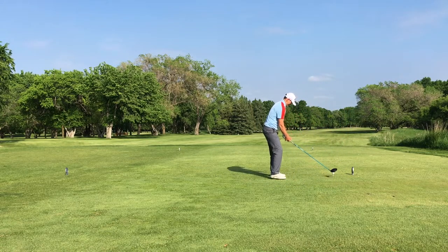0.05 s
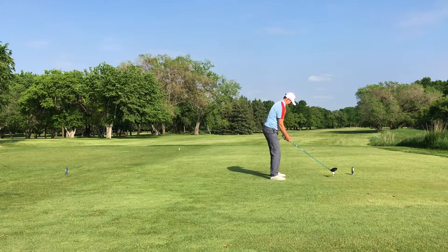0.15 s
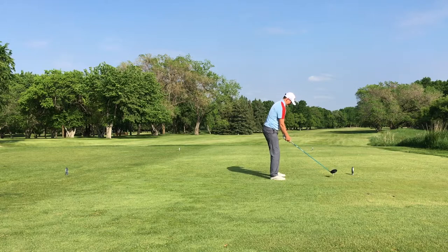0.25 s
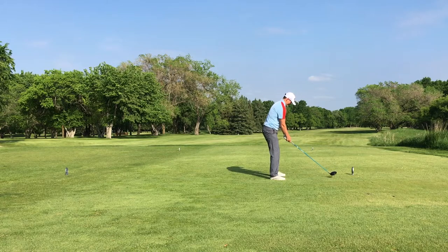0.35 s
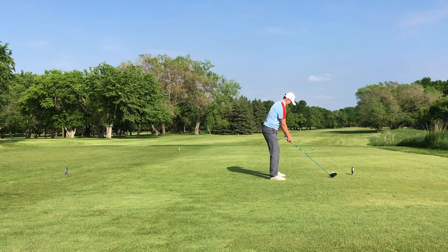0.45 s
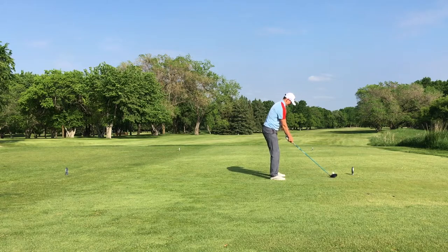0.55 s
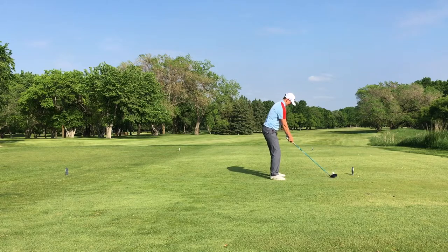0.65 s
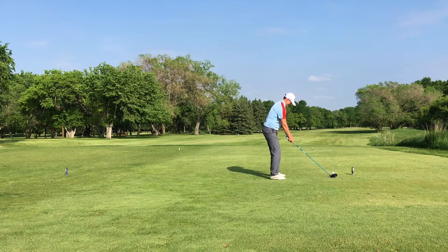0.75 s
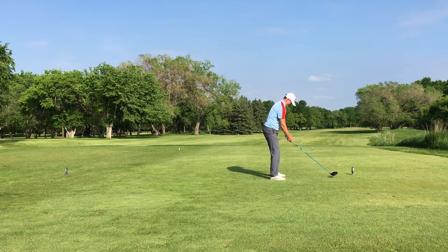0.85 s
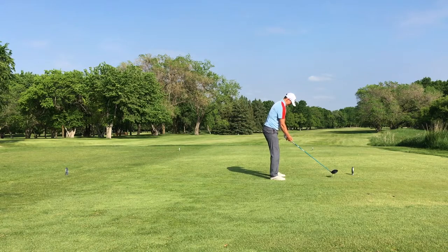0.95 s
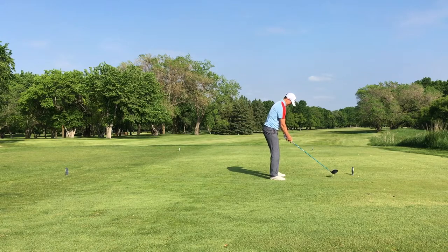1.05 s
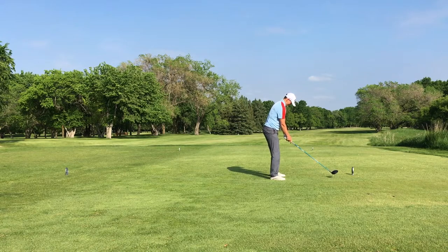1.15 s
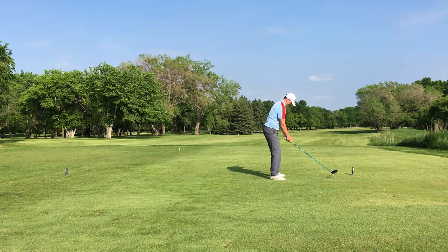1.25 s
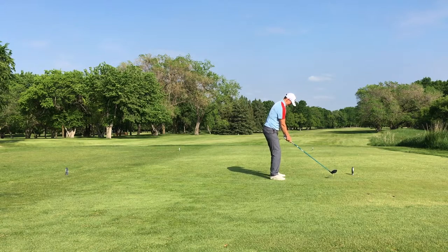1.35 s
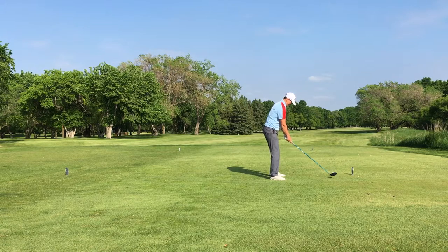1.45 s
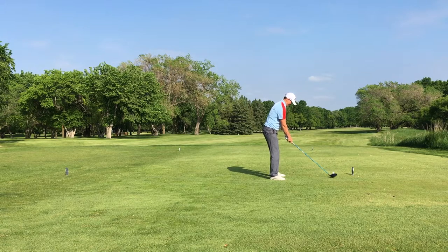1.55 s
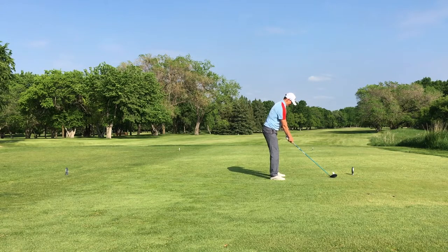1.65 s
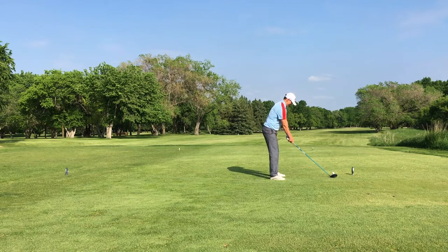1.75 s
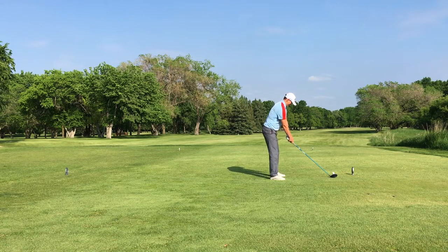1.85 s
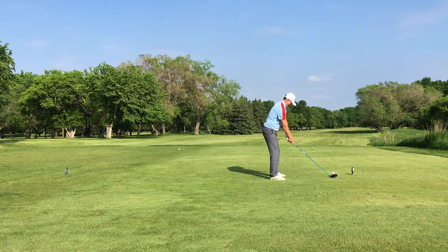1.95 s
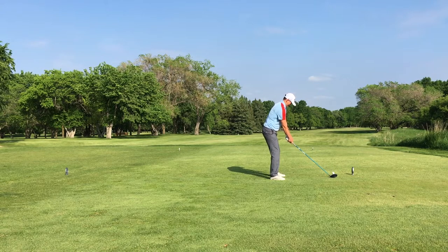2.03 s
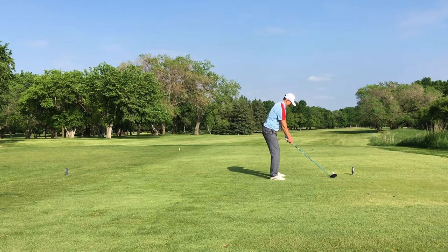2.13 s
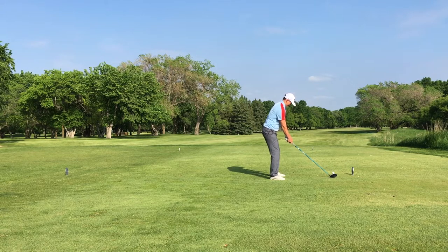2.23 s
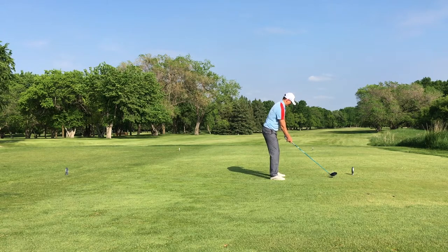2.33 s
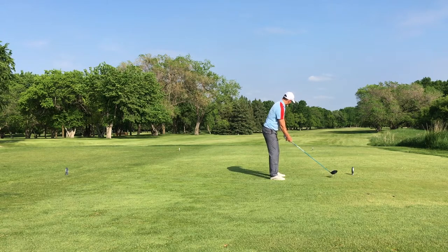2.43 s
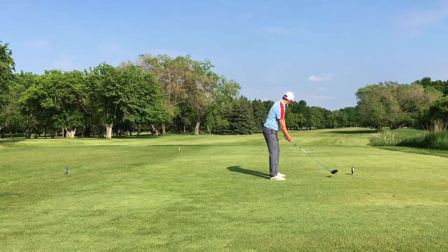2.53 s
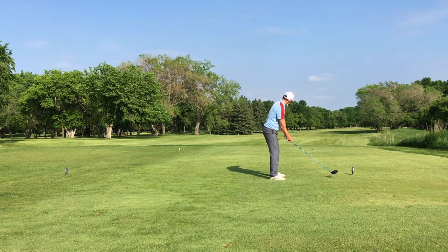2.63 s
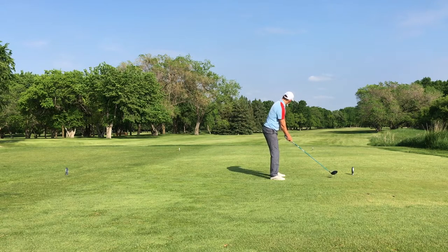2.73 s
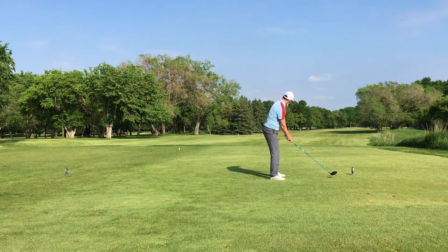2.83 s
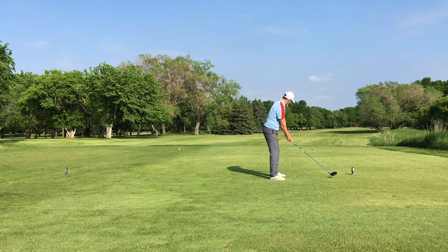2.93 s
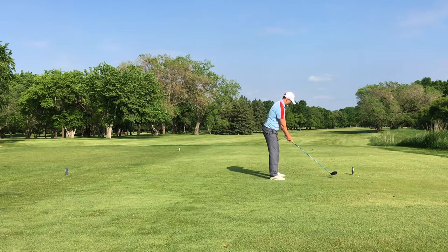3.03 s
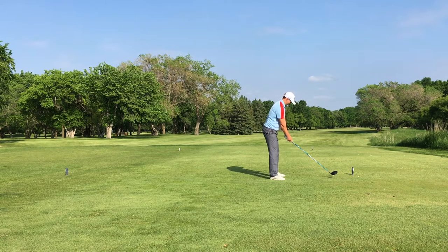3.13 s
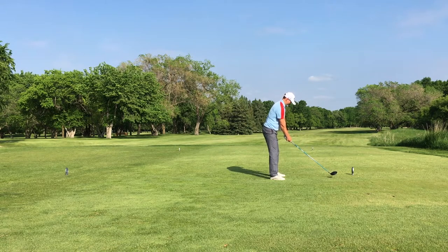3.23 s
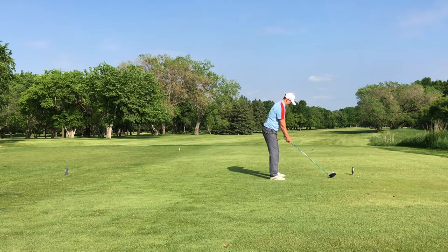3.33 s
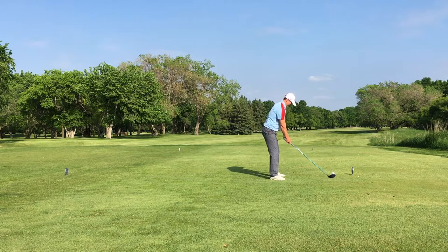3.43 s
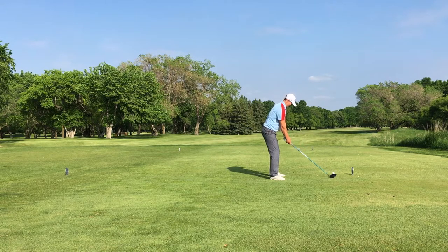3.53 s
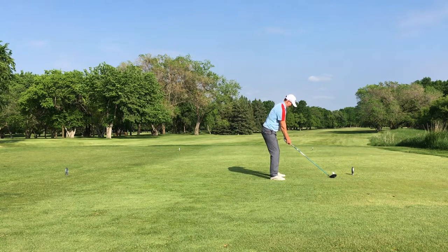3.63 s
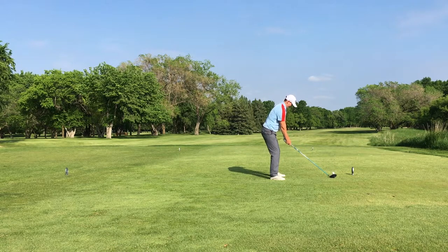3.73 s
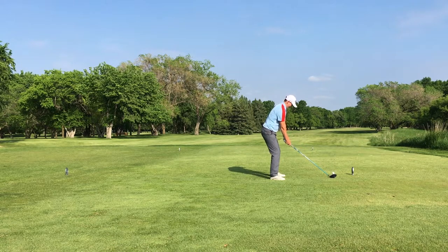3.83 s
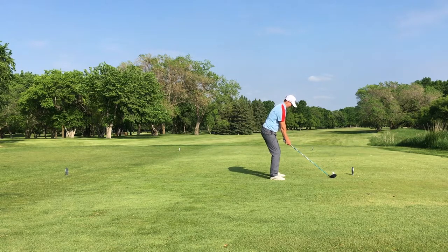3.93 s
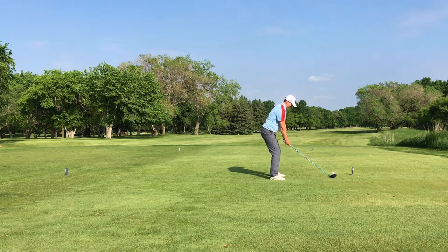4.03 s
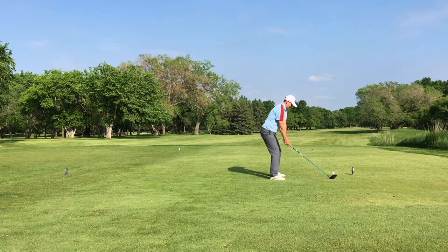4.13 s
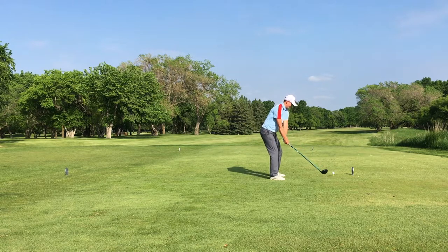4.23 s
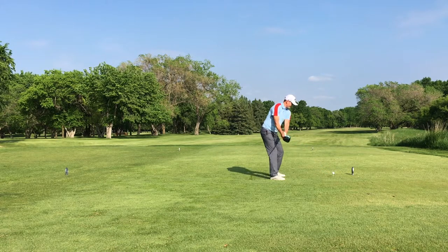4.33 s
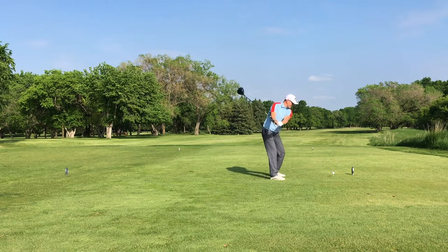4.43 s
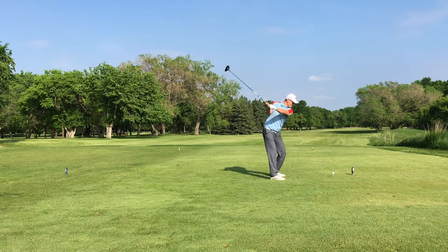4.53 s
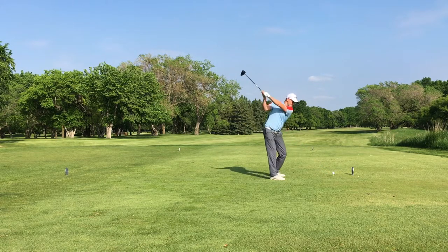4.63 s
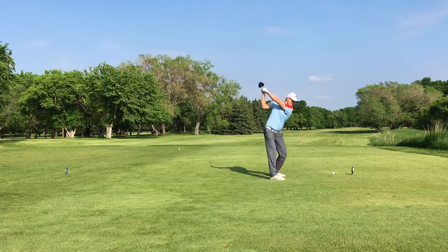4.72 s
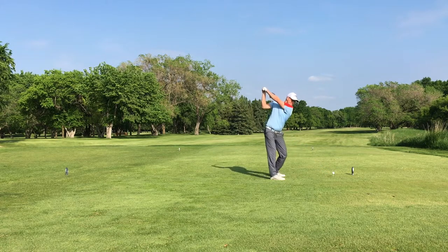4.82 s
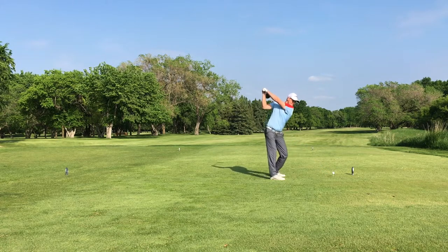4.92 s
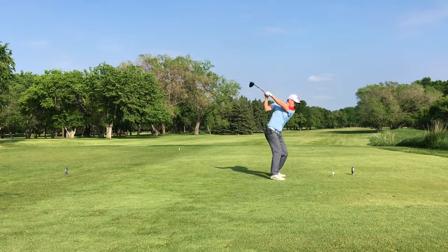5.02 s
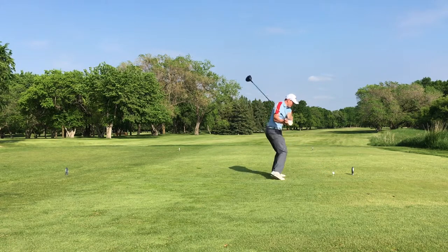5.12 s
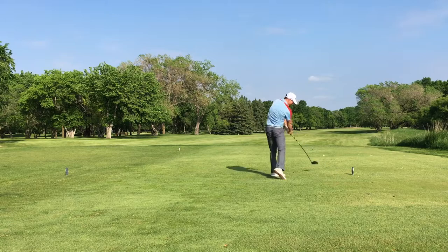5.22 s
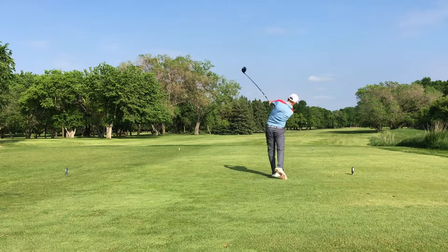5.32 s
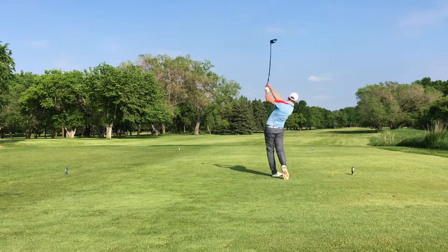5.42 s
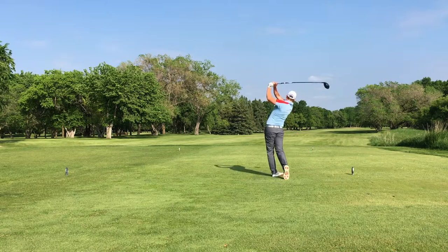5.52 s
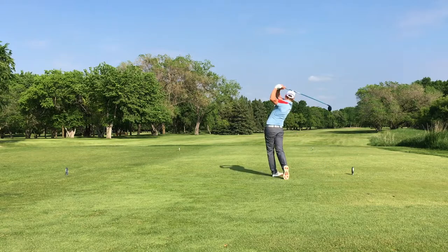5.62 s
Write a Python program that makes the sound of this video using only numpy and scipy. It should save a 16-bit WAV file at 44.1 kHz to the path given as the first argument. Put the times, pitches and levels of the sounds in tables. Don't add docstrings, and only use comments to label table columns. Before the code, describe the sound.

Outdoors on a calm golf course, a nearby songbird whistles four short sliding phrases while other birds answer faintly, blurred by leaves. Low wind puffs bump the microphone over distant road hum. Near the end the club lightly brushes grass, swishes down and strikes the ball with one very loud metallic crack, echoed by the trees.

```python
import sys
import numpy as np
from scipy import signal
from scipy.fft import rfft, irfft
from scipy.io import wavfile
from scipy.ndimage import uniform_filter1d

SR = 44100
rng = np.random.default_rng(int(sys.argv[2]) if len(sys.argv) > 2 else 0)


def boost_factor(decibels):
    exponent = np.asarray(decibels, float) / 20
    return 10 ** exponent


def store_pcm(level_fs):
    pcm = np.round(np.clip(level_fs, -1, 1) * 32767).astype(np.int16)
    wavfile.write(sys.argv[1], SR, np.atleast_2d(pcm).T)


N = 250047


def evened(x):
    return x / np.sqrt(np.mean(x ** 2) + 1e-20)


def smoothed(x, size):
    return uniform_filter1d(uniform_filter1d(x, size=size), size=size)


def drift(size, length=N):
    return evened(smoothed(rng.standard_normal(length), size))


def read_curve(points, hz):
    f, value = np.transpose(points)
    return np.interp(np.log(hz + 1), np.log(f + 1), value)


def add_at(mix, start_s, sound):
    part = mix[round(start_s * SR):][:len(sound)]
    part += sound[:len(part)]


def fader(rows):
    time_s, level_db = np.transpose(rows)
    return boost_factor(np.interp(np.arange(N) / SR, time_s, level_db, -150, -150))


def coloured(x, db_of):
    return irfft(rfft(x) * boost_factor(db_of(np.fft.rfftfreq(len(x), 1 / SR))), len(x))


def noise(spectrum, patchy_db, size=1024):
    hop = size // 4
    hz = np.fft.rfftfreq(size, 1 / SR)
    a, b, patches = rng.standard_normal((N // hop + 5, len(hz), 3)).T
    patches = uniform_filter1d(patches, size=8, axis=0)
    patches = evened(uniform_filter1d(patches, size=10, axis=1))
    z = (a + 1j * b) * boost_factor(read_curve(spectrum, hz)[:, None] + patchy_db * patches)
    return evened(signal.istft(z, nperseg=size, noverlap=size - hop)[1][:N])


def foliage(delay_s, build_up_s, longer, decay):
    hz, t, z = signal.stft(rng.standard_normal(SR), SR, nperseg=256)
    lumps = uniform_filter1d(rng.standard_normal(z.shape), size=3, axis=0)
    lumps_db = 2.4 * evened(uniform_filter1d(lumps, size=9, axis=1))
    decay_db = 60 * t / (longer * read_curve(decay, hz)[:, None])
    tail = signal.istft(z * boost_factor(lumps_db - decay_db), SR, nperseg=256)[1]
    tail = tail * np.minimum(np.arange(len(tail)) / SR / build_up_s, 1)
    return np.concatenate([np.zeros(round(delay_s * SR)), tail / np.linalg.norm(tail)])


def road_hum():
    # pitch_hz, density_db (dB per Hz)
    road = [(18, -75), (30, -53), (65, -13.5), (128, -0.5), (158, -10), (248, -9.5), (283, -22),
            (350, -15.5), (378, -22), (625, -19), (676, -16), (953, -14.5), (2220, -29.5), (14500, -45),
            (16500, -45)]
    return boost_factor(-59) * noise(road, patchy_db=-0.73)


def passing_vehicle():
    # time_s, level_db
    approach = [(0, -72.5), (1, -71.5), (2, -70), (3, -71), (4, -70.5), (4.4, -66), (4.8, -62),
                (5.1, -61.5), (5.67, -79.5)]
    # pitch_hz, density_db
    engine = [(150, -31), (290, -0.5), (320, -2.5), (350, -3.5), (610, -7), (655, -3), (700, -4),
              (1100, -4.5), (2500, -35.5)]
    return fader(approach) * noise(engine, patchy_db=2.0, size=4096)


def overtone_db(k, hz):
    # pitch_hz, level_db
    beak = [(4000, -37.5), (6500, -42.5), (8500, -45.5), (10500, -38), (12000, -30), (15000, -40)]
    if k == 2:
        slope_db = 4.5 * np.maximum(np.minimum(hz, 11900) - 8300, 0) / 1000
    else:
        slope_db = -25 * np.maximum(hz - 12700, 0) / 1000
    return read_curve(beak, hz) + slope_db


def note(rows):
    time_s, pitch_hz, level_db = np.transpose(rows)
    start_s, end_s = time_s[0], time_s[-1]
    t = np.arange(start_s, end_s, 1 / SR)
    pitch = uniform_filter1d(np.interp(t, time_s, pitch_hz), size=150, mode="nearest")
    turns = np.cumsum(pitch) / SR
    tone = np.sin(2 * np.pi * turns)
    for k in (2, 3):
        audible = k * pitch < 16000
        tone = tone + boost_factor(overtone_db(k, k * pitch)) * audible * np.sin(2 * np.pi * k * turns)
    edge = np.minimum(np.minimum(t - start_s, end_s - t) / .0015, 1)
    return start_s, np.sqrt(2) * boost_factor(np.interp(t, time_s, level_db)) * tone * edge


def sung(voice, effort_db, swell_s, turns):
    time_s, pitch_hz = np.transpose(turns)
    t = np.linspace(time_s[0], time_s[-1], num=60)
    pitch = np.interp(t, time_s, pitch_hz)
    swell_db = -15 * np.maximum(1 - (t - time_s[0]) / swell_s, 0)
    fade_db = -6.5 * np.maximum(1 - (time_s[-1] - t) / .011, 0)
    return np.transpose([t, pitch, effort_db + read_curve(voice, pitch) + swell_db + fade_db])


def through_air(notes, twigs_db, flutter_db, wet_db, trees_db, count, effort=1):
    # pitch_hz, t60_s
    leaves = [(300, .15), (1000, 0.53), (3000, 0.57), (8000, 0.42), (14000, 0.3)]
    dry = np.zeros(N)
    for rows in notes:
        add_at(dry, *note(rows))
    dry = dry * effort
    echoes = np.zeros(300)
    echoes[rng.integers(20, 300, size=count)] = boost_factor(twigs_db) * rng.standard_normal(count)
    echoes[0] = 1
    fluttering = dry * boost_factor(flutter_db * drift(250))
    near = signal.oaconvolve(fluttering, echoes / np.linalg.norm(echoes))[:N]
    near = coloured(near, lambda hz: -22 / (1 + ((hz - 4200) / 19) ** 2))
    scatter = np.zeros(SR)
    add_at(scatter, 0, boost_factor(wet_db) * foliage(.004, 0.0043, 0.19, leaves))
    add_at(scatter, 0, boost_factor(trees_db) * foliage(0.024, 0.0037, 1.37, leaves))
    return near + signal.fftconvolve(dry, scatter)[:N]


def note_swells():
    # time_s, half_width_s, level_db
    swells = [(.5, .006, 0), (.56, .01, 6.5), (.6, 0.012, 5.5), (.62, 0.013, 5), (.75, .015, 0),
              (.797, 0.0046, -6), (.815, 0.0097, 0.5), (.85, 0.011, -3.5), (.91, 0.0071, 4),
              (.935, .012, -0.5), (.985, 0.01, -1), (1.035, 0.021, -5.5), (2.034, 0.0072, -11),
              (2.088, 0.0072, -6), (2.097, 0.0033, 7), (2.193, 0.0034, -2), (2.52, 0.0022, -8),
              (2.205, 0.0092, 1), (2.226, 0.0065, -5), (2.252, 0.0093, 0), (2.287, .01, 1.5),
              (2.315, 0.01, 4), (2.36, 0.036, -3), (2.405, 0.011, 0), (2.436, 0.01, -12.5),
              (2.455, 0.0078, 2), (2.51, .012, 1), (3.616, 0.0095, 3), (3.63, 0.0018, -15),
              (3.655, 0.016, -1.5), (3.68, 0.011, -1.5), (3.75, 0.0077, 2), (3.774, 0.0071, -6),
              (3.82, 0.013, 4), (3.855, .004, -4), (3.88, 0.026, -4), (2.535, .01, 0.1),
              (4.918, 0.0055, -1), (4.946, 0.014, -7), (4.74, .004, -3), (4.776, 0.0037, -5.5),
              (4.963, .005, 3.5), (4.985, .01, 1), (5.06, .008, -3), (5.114, 0.002, 4), (5.11, 0.0034, -5),
              (5.085, 0.0018, 6.5), (5.078, 0.0045, -2), (.765, .003, -3), (.808, 0.0026, -0.5),
              (.9, .004, -4), (3.58, 0.0049, 2.5), (2.47, 0.0047, -2), (5.1, .007, 1), (5.128, .008, -1)]
    t = np.arange(0, N, 16) / SR
    time_s, width_s, level_db = np.transpose(swells)[:, :, None]
    bumps_db = (level_db * np.exp(-((t - time_s) / width_s) ** 2)).sum(0)
    return boost_factor(np.interp(np.arange(N) / SR, t, bumps_db))


def near_singer():
    # pitch_hz, level_db
    throat = [(2150, -51.5), (2450, -50.5), (2850, -41.5), (3250, -44), (3750, -40), (4200, -45.5),
              (5000, -54), (6200, -62)]
    # (time_s, pitch_hz)
    first = [
        (0, 0.018, [(0.493, 3380), (0.505, 4300), (0.517, 4750), (0.53, 4440)]),
        (0, 0.0056, [(0.545, 5480), (0.558, 6260), (0.58, 5970), (0.6, 5870), (0.625, 4950)]),
        (0, .03, [(0.717, 2594), (0.75, 2867), (0.775, 2627), (0.797, 2143), (0.815, 3174), (0.84, 3082), (0.865, 2914)]),
        (0, 0.021, [(0.907, 2780), (0.93, 2830), (0.95, 2640), (0.968, 2224), (0.985, 3130), (1.045, 2850)]),
    ]
    second = [
        (0, 0.016, [(2.03, 3530), (2.045, 4880), (2.062, 4810), (2.078, 5380), (2.092, 3230)]),
        (0, 0.014, [(2.093, 3600), (2.11, 3720), (2.125, 3883), (2.143, 3160)]),
        (0, .012, [(2.189, 2950), (2.205, 2897), (2.225, 2213), (2.235, 3160), (2.243, 2866), (2.27, 3270), (2.29, 3050), (2.312, 2200)]),
        (0, 0.0027, [(2.312, 2313), (2.335, 2470), (2.372, 2563), (2.395, 3790), (2.418, 4120), (2.434, 4200), (2.448, 4014), (2.476, 3182), (2.52, 3075)]),
    ]
    third = [
        (-5, 0.014, [(3.552, 3080), (3.562, 3830), (3.575, 3805), (3.585, 3650), (3.593, 2880)]),
        (1, 0.014, [(3.599, 2890), (3.612, 3824), (3.626, 4040), (3.634, 4450), (3.646, 3164), (3.68, 2905), (3.71, 2080)]),
        (1, 0.0033, [(3.728, 2260), (3.75, 2840), (3.768, 3420), (3.779, 3506), (3.79, 2716), (3.85, 2577), (3.9, 2343)]),
    ]
    fourth = [
        (4.5, 0.0082, [(4.737, 3520), (4.744, 4690), (4.753, 5200), (4.763, 5200), (4.771, 4710), (4.778, 3700)]),
        (1.2, 0.013, [(4.913, 2900), (4.925, 3050), (4.945, 2190), (4.97, 3033), (4.985, 2930), (5.005, 2390), (5.02, 2570)]),
        (1.44, 0.016, [(5.05, 3190), (5.065, 3310), (5.085, 3686), (5.103, 5130), (5.115, 3480), (5.13, 2860), (5.145, 2510)]),
    ]
    notes = [sung(throat, *row) for row in first + second + third + fourth]
    return through_air(notes, -49.0, 0.68, -13.0, -19.5, count=10, effort=note_swells())


def slur(start_s, length_s, from_hz, to_hz, level_db):
    u = np.linspace(0, 1, num=15)
    slide = u - .45 * np.sin(2 * np.pi * u) / (2 * np.pi) + .05 * np.sin(np.pi * u)
    swell_db = np.interp(u, [0, .5, 1], [-4, 0, -3])
    return np.transpose([start_s + length_s * u, from_hz + (to_hz - from_hz) * slide, level_db + swell_db])


def trill(count):
    start_s, every_s, chip_s = 2.7135, .0552, .013
    high_hz = np.linspace(4800, 5300, num=count)
    low_hz = np.linspace(4450, 3990, num=count)
    level_db = np.linspace(-84, -71, num=count)
    at = start_s + every_s * np.arange(count)
    return [[(s, a, d), (s + chip_s, b, d)] for s, a, b, d in zip(at, high_hz, low_hz, level_db)]


def far_birds():
    # start_s, length_s, from_hz, to_hz, level_db
    falls = [(.538, .028, 3170, 2950, -75), (.775, .025, 5100, 4300, -74), (1.06, .045, 4380, 4000, -71),
             (1.195, .02, 4600, 4280, -74), (1.278, .04, 4480, 3970, -66), (1.54, .045, 7300, 4800, -72),
             (1.577, .029, 2950, 2300, -73.5), (1.7, .031, 7250, 5330, -73), (1.725, .03, 5350, 4770, -70),
             (2.813, .016, 3540, 3430, -76), (3.285, .013, 6670, 4970, -70), (3.373, .074, 3660, 2860, -80),
             (3.81, .025, 3560, 3480, -64), (4.03, .03, 3520, 3480, -76), (4.288, .012, 2900, 2750, -74),
             (4.414, .01, 3060, 2900, -76), (4.455, .014, 3060, 2900, -76), (4.62, .064, 3320, 3020, -81)]
    # start_s, length_s, from_hz, to_hz, level_db
    rises = [(1.59, .034, 4750, 5070, -76), (1.67, .02, 5700, 6100, -79), (1.975, .044, 3500, 4800, -78),
             (2.31, .05, 4500, 5100, -76), (3.28, .03, 3330, 4520, -76), (4.255, .015, 2780, 2900, -73)]
    # (time_s, pitch_hz)
    tunes = [
        (-72, 0.013, [(1.112, 5700), (1.13, 5650), (1.15, 5000), (1.163, 3850), (1.18, 3600)]),
        (-71, .01, [(1.322, 4400), (1.33, 5500), (1.345, 5450), (1.368, 4800), (1.385, 3550), (1.41, 3450), (1.425, 3100)]),
        (-75, 0.0082, [(1.425, 3100), (1.45, 3450), (1.48, 4500), (1.5, 5400), (1.52, 5800)]),
        (-73.5, 0.0053, [(1.622, 2350), (1.636, 3300), (1.655, 3050), (1.672, 3050), (1.682, 2550), (1.715, 2250), (1.755, 2650), (1.775, 2350)]),
        (-81, 0.018, [(1.81, 3500), (1.83, 3750), (1.845, 3500), (1.87, 3700), (1.887, 4600), (1.91, 4700), (1.93, 4450), (1.955, 4750)]),
    ]
    # pitch_hz, level_db
    throat = [(2300, -1.5), (3100, 0), (3600, -1.5), (4500, 4.5), (5600, -1.5)]
    notes = [slur(*row) for row in falls + rises] + trill(count=17)
    notes += [sung(throat, *row) for row in tunes]
    return through_air(notes, -28, 2.0, -10, -10, count=30)


def gusts():
    # start_s, hold_s, level_db
    puffs = [(.88, .03, -82), (1.019, 0.0072, -50), (1.167, 0.068, -58), (1.414, 0.027, -39),
             (1.505, 0.01, -50), (1.597, 0.16, -39), (1.73, 0.028, -41), (1.897, 0.035, -41.5),
             (2.06, 0.04, -48.5), (2.44, 0.042, -51.5), (2.581, 0.034, -55), (2.702, 0.028, -57.5),
             (2.98, 0.021, -58.5), (3.088, 0.11, -59.5), (3.32, 0.3, -55), (3.67, 0.076, -49.5),
             (3.859, 0.022, -54), (3.97, 0.024, -54), (4.188, 0.03, -58.5), (4.324, 0.12, -59),
             (4.647, 0.026, -60), (5.094, 0.13, -50.5), (5.33, 0.051, -54.5)]
    # time_s, level_db
    breeze = [(.9, -101), (1.1, -61.5), (3, -61), (5.68, -63)]
    t = np.arange(N) / SR
    coarse = t[::64]
    start_s, hold_s, level_db = np.transpose(puffs)[:, :, None]
    rise_db = 714 * np.maximum(start_s - coarse, 0)
    fall_db = 406 * np.maximum(coarse - start_s - hold_s, 0)
    return fader(breeze) + np.interp(t, coarse, boost_factor(level_db - rise_db - fall_db).max(0))


def steadied(x):
    return x / np.sqrt(smoothed(x ** 2, 2000) + 0.017)


def wind():
    # pitch_hz, density_db (dB per Hz)
    turbulence = [(12, -49), (20, -29), (60, 0.5), (100, -2.5), (161, -12.5), (229, -22), (292, -45.5),
                  (387, -39.5), (480, -50), (500, -49), (650, -83), (1100, -120)]
    push = gusts() * steadied(noise(turbulence, patchy_db=6.5, size=2048))
    push = push * boost_factor(1.5 * drift(500))
    stop = boost_factor(-34.5)
    return stop * np.tanh(push / stop)


def wind_flaps():
    # start_s, pitch_hz, level_db
    slaps = [
        (1.418, 142, -30),
        (1.633, 158, -34),
        (1.7, 150, -31.5),
        (1.754, 122.5, -30),
        (1.879, 147, -31.5),
    ]
    out = np.zeros(N)
    t = np.arange(4000) / SR
    for start_s, pitch_hz, level_db in slaps:
        wobble = np.sin(2 * np.pi * pitch_hz * t / (1 + 4.4 * t))
        add_at(out, start_s, boost_factor(level_db - 60 * t / 0.074) * wobble * np.minimum(t / 0.0038, 1))
    return out


def rival_singer():
    # (time_s, pitch_hz)
    arches = [
        (-9, 0.0035, [(2.04, 4400), (2.055, 6670), (2.075, 6340)]),
        (1.5, 0.0045, [(3.24, 4450), (3.255, 6700), (3.27, 6970), (3.285, 6640)]),
        (2.5, 0.0054, [(4.719, 3620), (4.731, 6300), (4.741, 6860), (4.765, 6860), (4.775, 5900), (4.781, 4660)]),
        (6.5, 0.0025, [(4.804, 3350), (4.808, 4320), (4.814, 6330), (4.821, 4540), (4.833, 6300), (4.842, 6900), (4.852, 6000), (4.863, 4370)]),
    ]
    # pitch_hz, level_db
    throat = [(3100, -41), (4300, -52), (5500, -58.5), (6300, -65), (6900, -68.5)]
    return through_air([sung(throat, *row) for row in arches], -26, 1.8, -8, -12, count=14)


def twinkling(song):
    top = coloured(song, lambda hz: -80 / (1 + (hz / 7300) ** 30))
    return song + top * (boost_factor(3.5 * drift(300) - 4.0) - 1)


def grass_brush():
    # time_s, level_db
    contact = [(4.08, -92), (4.125, -79), (4.14, -82), (4.18, -74), (4.2, -76), (4.22, -95)]
    blades = [(5000, -25), (7200, -5), (8400, -12), (9600, 0), (11000, -6), (14000, -12)]  # (Hz, dB per Hz)
    return fader(contact) * noise(blades, patchy_db=4.0, size=256)


def gear_whine():
    # start_s, length_s, pitch_hz, level_db
    gears = [
        (4.252, 0.4, 315.4, -68.5),
        (4.59, 0.368, 664, -72),
    ]
    out = np.zeros(N)
    for start_s, length_s, pitch_hz, level_db in gears:
        u = np.arange(0, 1, 1 / (length_s * SR))
        turns = np.cumsum(pitch_hz * (1 + 0.015 * np.sin(2 * np.pi * 1.32 * u))) / SR
        add_at(out, start_s, np.sqrt(2) * boost_factor(level_db) * np.sin(np.pi * u) * np.sin(2 * np.pi * turns))
    return out


def swish():
    # time_s, level_db
    speed = [(5.12, -69), (5.18, -70), (5.21, -53), (5.24, -45.5), (5.265, -45), (5.3, -58.5), (5.4, -77)]
    # pitch_hz, density_db (dB per Hz)
    torn_air = [(260, -36), (450, 1.5), (782, -3), (1810, -6.5), (2830, -8.5), (4230, -7.5), (8930, -17.5),
                (9770, -19), (16000, -22.5)]
    return fader(speed) * noise(torn_air, patchy_db=1.0, size=256)


def burst(t, level_db, t60_s, spectrum):
    puff = evened(coloured(rng.standard_normal(len(t)), lambda hz: read_curve(spectrum, hz)))
    return puff * boost_factor(level_db - 60 * t / t60_s)


def ball_push(t):
    return boost_factor(-5.5) * np.sin(2 * np.pi * np.minimum(1800 * t, 1))


def tee_whir(t):
    start_s, end_s = .022, 0.06
    u = np.clip((t - start_s) / (end_s - start_s), 0, 1)
    turns = np.cumsum(np.interp(u, [0, 1], (1850, 2060))) / SR
    return boost_factor(-57) * np.sin(np.pi * u) * np.sin(2 * np.pi * turns)


def ball_thump(t):
    # pitch_hz, level_db, t60_s
    ball = [(160, -24, .03), (410, -22, .018), (760, -23, .012), (2100, -30, .01)]
    return sum(boost_factor(db - 60 * t / t60) * np.sin(2 * np.pi * hz * t) for hz, db, t60 in ball)


def head_ring(t):
    # pitch_hz, level_db, t60_s
    face = [(4065, -25.5, .1), (5180, -20.5, .16), (5270, -27, .1), (5362, -22, .12)]
    # pitch_hz, level_db, t60_s
    shell = [(3030, -31, .035), (3230, -33, .03), (4330, -30, 0.04), (5820, -21, 0.065), (6070, -17, 0.06),
             (6740, -14, 0.05), (7010, -20, 0.045), (7290, -16, .035), (7520, -18, 0.04),
             (7945, -4.5, 0.03), (8310, -14, 0.025), (8580, -16, 0.03), (9220, -23, 0.03),
             (11630, -20, 0.02),
             (9605, -17, .02), (10740, -18, .018), (12900, -21, .015), (5310, -16, .025), (5560, -24, .05)]
    heard = t + 8.5 * t ** 3
    ring = np.zeros(len(t))
    for pitch_hz, level_db, t60_s in face + shell:
        rattle_db = 3.0 * drift(90, len(t))
        gain = boost_factor(level_db + rattle_db - 60 * t / t60_s)
        ring += gain * np.sin(2 * np.pi * (pitch_hz * heard + rng.random()))
    facing = 1 / (1 + np.exp((t - .036) / .003))
    return ring * facing


def strike():
    # pitch_hz, density_db (dB per Hz)
    crack_colour = [(100, -50), (1000, -5), (1700, 8), (2600, 9), (3320, 14), (4020, 11), (5300, 14),
                    (6000, 5), (7770, 19), (8640, 19), (10700, 13), (13300, 9), (16000, 0)]
    sizzle_colour = [(1500, -26), (4800, -18), (6500, 0), (9000, -7), (10500, -13), (13000, -12), (16000, -17)]
    t = np.arange(3000) / SR
    onset = np.minimum(t / .0007, 1)
    crack = burst(t, -3.5, 0.015, crack_colour) * onset ** 2
    sizzle = burst(t, -23.5, .09, sizzle_colour)
    return ball_push(t) + tee_whir(t) + crack + (ball_thump(t) + sizzle + head_ring(t)) * onset


def drive():
    # delay_s, build_up_s, level_db, loss_db_per_khz
    tree_lines = [
        (0.04, 0.021, -38, 0.64),
        (0.201, 0.039, -57.5, 3),
        (.32, .04, -61, 4),
    ]
    # pitch_hz, t60_s
    fairway = [(300, .12), (1200, 0.37), (3000, 0.84), (5500, 0.37), (8000, 0.47), (14000, 0.49)]
    # pitch_hz, density_db (dB per Hz)
    sent_back = [(180, -54.5), (300, -29), (478, -24), (814, -12.5), (1010, -31), (1100, -27), (2440, -13),
                 (2840, -11.5), (3700, -15), (4440, -4.5), (4990, -6.5), (5610, 0), (6850, -4), (8220, -2),
                 (16000, -22)]
    impact_s, slap_s = 5.26995, .0575
    out = np.zeros(N)
    hit = strike()
    add_at(out, impact_s, hit)
    add_at(out, impact_s + slap_s, coloured(hit, lambda hz: -29 - 2.5 * abs(hz - 3500) / 1000))
    steps = np.arange(len(hit))
    sharper = np.interp(steps * 1.035, steps, hit)
    dulled = coloured(sharper, lambda hz: -.5 * np.maximum(hz - 9000, 0) / 1000)
    for delay_s, build_up_s, level_db, loss_db in tree_lines:
        taps = foliage(delay_s, build_up_s, 0.98, fairway)
        taps = coloured(taps, lambda hz: -loss_db * abs(hz - 5000) / 1000)
        wash = coloured(taps, lambda hz: read_curve(sent_back, hz))
        peak = abs(uniform_filter1d(wash ** 2, size=800)).max() ** .5
        add_at(out, impact_s, boost_factor(level_db - 0.5) * wash / peak)
        add_at(out, impact_s, boost_factor(level_db + 13) * signal.fftconvolve(dulled, taps))
    return out


def scene():
    traffic = road_hum() + passing_vehicle() + gear_whine()
    song = twinkling(near_singer() + far_birds() + rival_singer())
    air = wind() + wind_flaps()
    golfer = grass_brush() + swish() + drive()
    return (traffic + song + air + golfer)[None]


def band_limit(x):
    return signal.sosfilt(signal.butter(12, 16860, fs=SR, output="sos"), x)


def record(dry):
    ceiling = .66
    limited = ceiling * np.tanh(dry / ceiling)
    band = signal.firwin(511, 15680, window=("kaiser", 9), fs=SR)
    finished = signal.oaconvolve(limited, band[None], "same")
    return band_limit(finished)


dry = scene()
out = record(dry)
store_pcm(out)
```